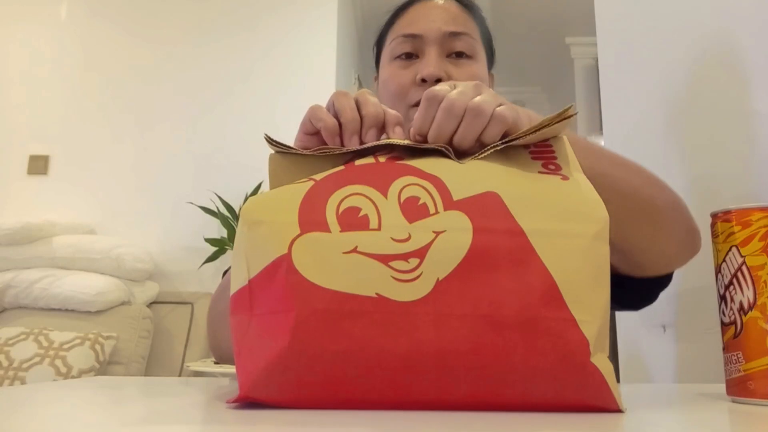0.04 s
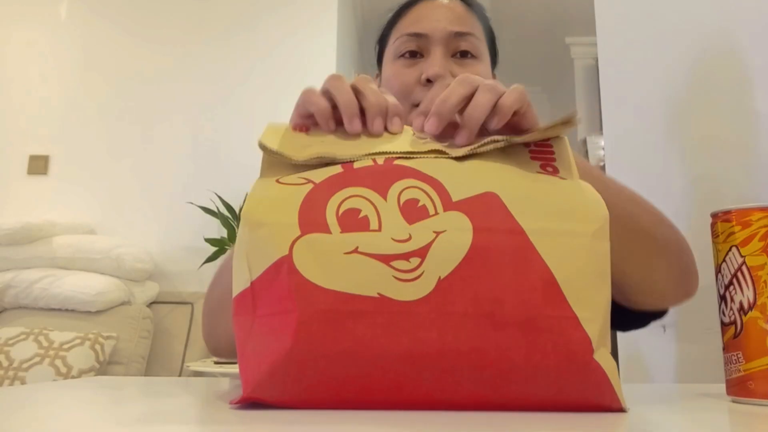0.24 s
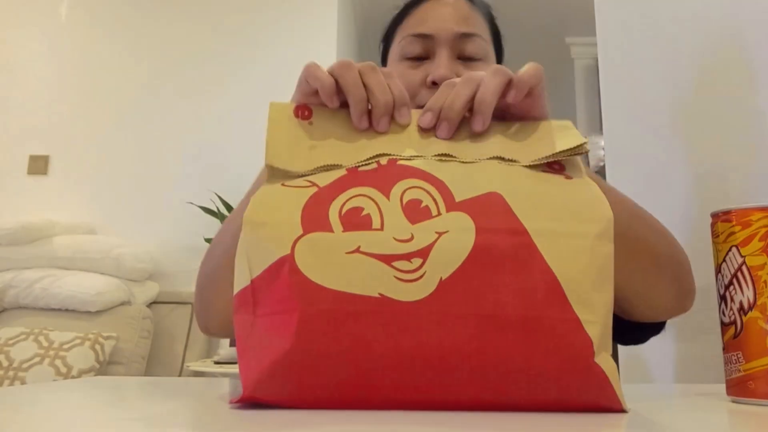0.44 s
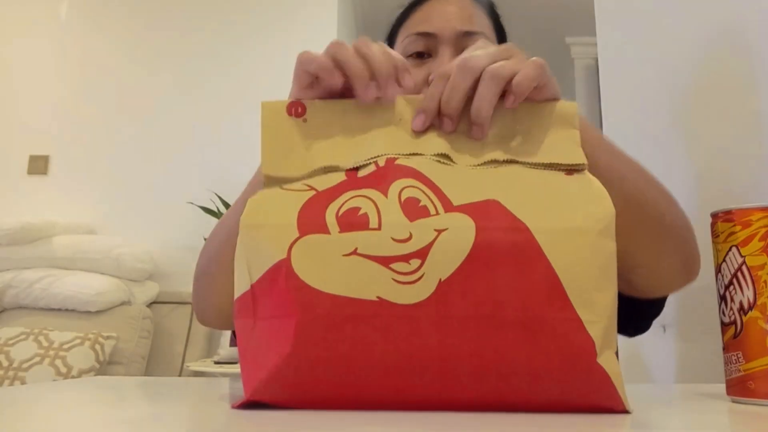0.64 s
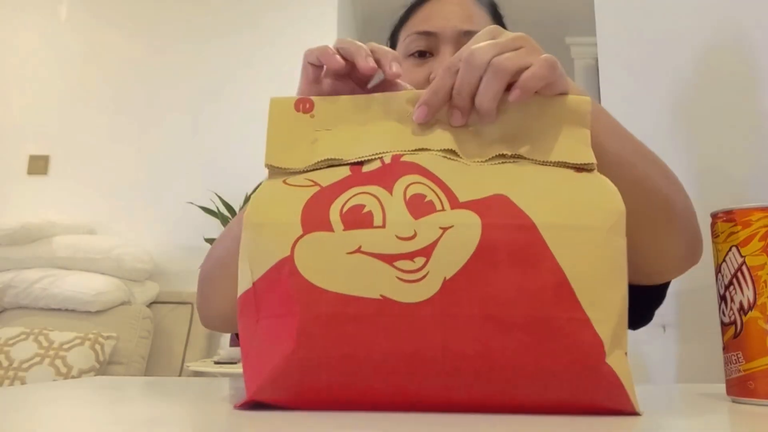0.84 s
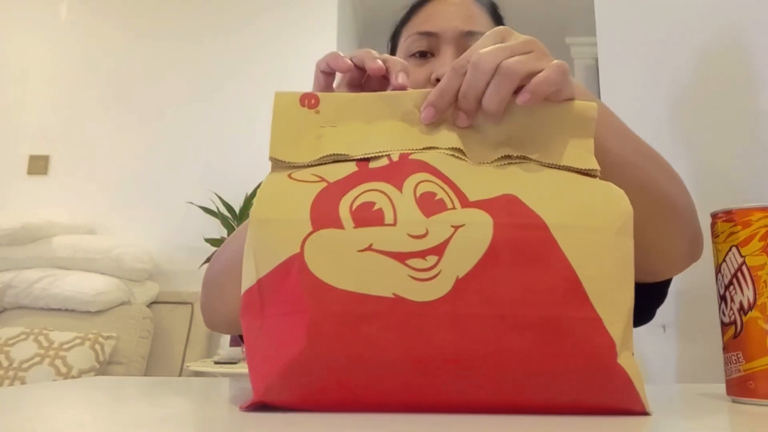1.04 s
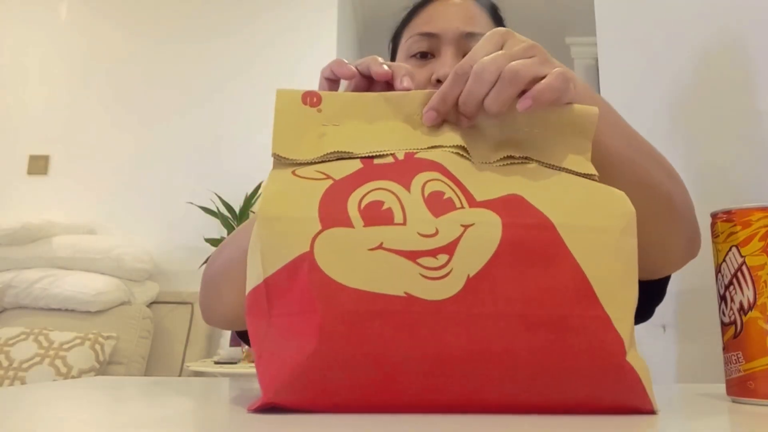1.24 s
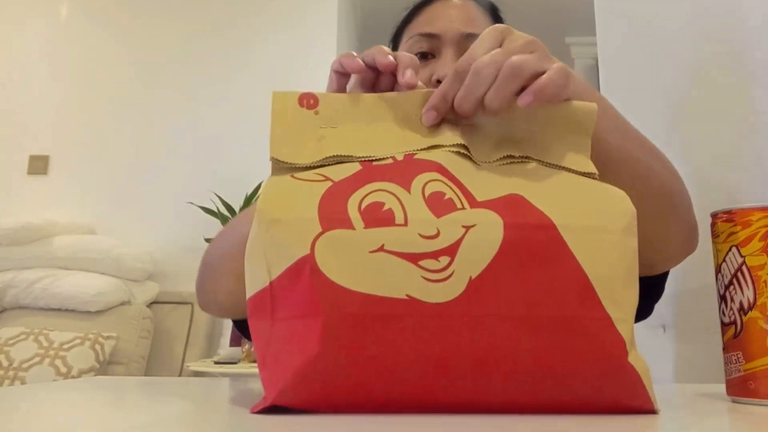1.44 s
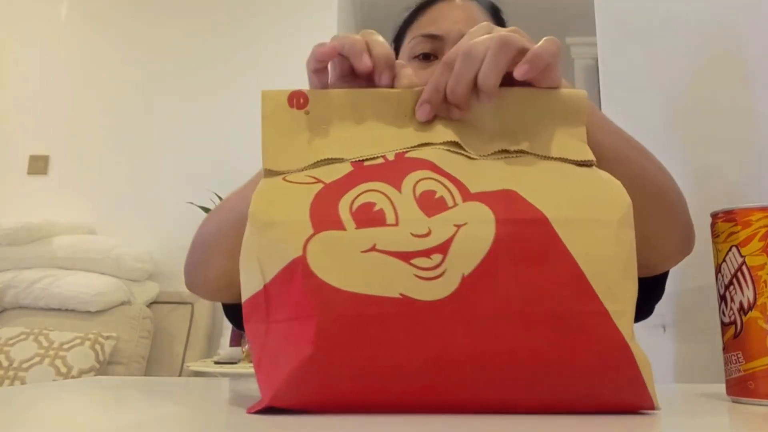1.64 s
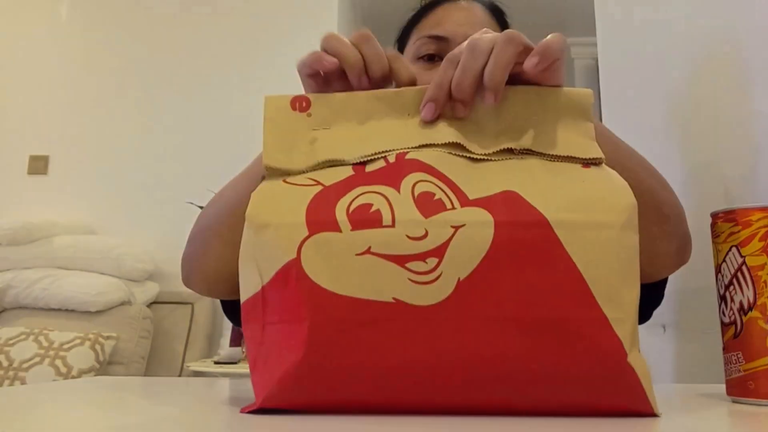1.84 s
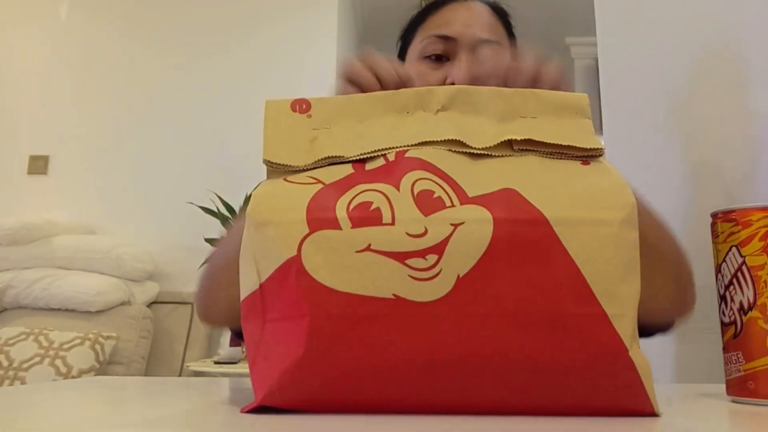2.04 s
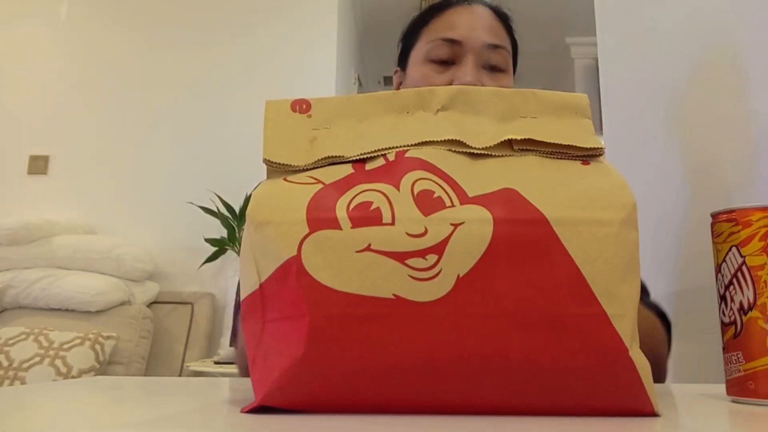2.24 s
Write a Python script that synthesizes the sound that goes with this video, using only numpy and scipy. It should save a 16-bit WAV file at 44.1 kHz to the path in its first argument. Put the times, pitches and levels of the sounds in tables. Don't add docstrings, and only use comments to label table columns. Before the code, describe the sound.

Hands work the folded top of a heavy paper bag on a table: quick bursts of sharp crackle, brittle snaps and dull base bumps, easing to a soft finger brush, with short room reverberation and faint air.

```python
import sys
import numpy as np
from scipy import signal
from scipy.fft import rfft, irfft, next_fast_len
from scipy.io import wavfile
from scipy.ndimage import uniform_filter1d, map_coordinates

SR = 44100
rng = np.random.default_rng(int(sys.argv[2]) if len(sys.argv) > 2 else 0)


def wrap_up_sound(samples):
    columns = np.atleast_2d(samples).T
    tamed = np.clip(columns, -1, 1)
    steps = np.round(tamed * 32767).astype(np.int16)
    wavfile.write(sys.argv[1], SR, steps)


def undo_db(level):
    steps = np.asarray(level, float) / 20
    return 10 ** steps


N = 101429


def unit(x):
    return x / np.sqrt(np.mean(x ** 2) + 1e-20)


def noise():
    return rng.standard_normal(N)


def along(points, hz):
    f, v = np.transpose(points)
    return np.interp(np.log(hz + 1), np.log(f + 1), v)


def wobble(knots_per_s):
    return map_coordinates(rng.standard_normal(300), [np.arange(N) * knots_per_s / SR])


def coloured(x, spectrum):
    m = 2 * next_fast_len(N // 2 + 4096)
    hz = np.fft.rfftfreq(m, 1 / SR)
    gain = undo_db(along(spectrum, hz)) * np.clip(hz / spectrum[0][0], 1e-3, 1) ** 2
    cepstrum = irfft(np.log(gain / np.sqrt(np.mean(gain ** 2))), m)
    cepstrum[1:m // 2] *= 2
    cepstrum[m // 2 + 1:] = 0
    return irfft(rfft(x, m) * np.exp(rfft(cepstrum)), m)[:N]


def ring(t, hz, t60_s, rise_s):
    return undo_db(-60 * t / t60_s) * (1 - np.exp(-t / rise_s)) * np.sin(2 * np.pi * hz * t)


def resonance(f, hz, q):
    return 1j * f * hz / q / (hz * hz - f * f + 1j * f * hz / q)


def patchy(x):
    patch_db = 3
    z = signal.stft(x, nperseg=256)[2]
    field = uniform_filter1d(rng.standard_normal(z.shape), size=9, axis=0)
    field = uniform_filter1d(field, size=4, axis=1)
    return signal.istft(z * undo_db(patch_db * unit(field)), nperseg=256)[1][:N]


# (frequency [Hz], density [dB per Hz])
AIR_SPECTRUM = [(25, -7), (90, -2.5), (200, -6), (450, -19), (1100, -20), (4000, -32.5), (16000, -33.5)]
AIR_DB, DUCK_DB, DUCK_S = -53.5, 9, 0.051


def floor(bag):
    hop = 64
    memory = np.exp(-np.arange(300) * hop / SR / DUCK_S)
    busy = np.convolve(np.abs(bag[::hop]) > .05, memory)
    depth = np.interp(np.arange(N), np.arange(len(busy)) * hop, np.tanh(busy))
    air = unit(coloured(noise(), AIR_SPECTRUM))
    return undo_db(AIR_DB + 1.1 * wobble(36)) * undo_db(-DUCK_DB * depth) * air


# (time [s], peak [dB], pitch [Hz])
BASE_BUMPS = [(0, -26, 637), (0.028, -36.5, 46.8), (.09, -36, 52.8), (.165, -32, 430), (0.239, -44, 72),
              (0.281, -22, 542), (0.331, -42, 218), (0.4, -25, 168), (1.1, -38, 56.3), (0.473, -28, 192),
              (0.599, -22, 250), (0.719, -26.5, 225), (1.044, -17, 217), (1.19, -27.5, 207),
              (1.23, -44, 49.3), (1.301, -31.5, 104.3), (1.431, -14.5, 456), (1.577, -24, 247),
              (1.637, -36.5, 122), (1.809, -21.5, 133), (1.819, -17.5, 218), (2.021, -24.5, 547),
              (2.054, -31, 558)]
BUMP_T60_S = 0.11
BUMP_RISE_CYCLES, BUMP_RING_CYCLES = 0.15, 8


def bumps():
    out, t = np.zeros(N + SR), np.arange(SR // 2) / SR
    for s, db, hz in BASE_BUMPS:
        t60_s = BUMP_T60_S * (200 / hz) ** .25
        rise = 1 - np.exp(-t * hz / BUMP_RISE_CYCLES)
        drive = undo_db(-60 * t / t60_s) * rise * rng.standard_normal(len(t))
        mode = ring(t, hz, BUMP_RING_CYCLES / hz, 1 / hz)
        thud = signal.fftconvolve(drive, mode)[:len(t)]
        out[round(s * SR):][:len(t)] += undo_db(db) * thud / np.abs(thud).max()
    return out[:N]


# (time [s], level [dB])
HAND_EFFORT = [(.02, -47.5), (.05, -57), (0.196, -45), (0.214, -30.5), (.81, -36), (.87, -52.5),
               (1.06, -34.5), (1.16, -47), (1.213, -28.5), (1.401, -39.5), (1.5, -64), (1.621, -26.5),
               (1.705, -38), (1.79, -58.5), (1.82, -22), (1.899, -35.5), (1.971, -44), (2.089, -63.5)]
# (frequency [Hz], density [dB per Hz])
RUSTLE_SPECTRUM = [(280, -4), (420, 2), (900, -3), (2500, -7), (5600, -17), (9000, -26), (16000, -23.5)]
CRACKLES_PER_S, CRACKLE_SPREAD_DB, CRACKLE_T60_S, SLIDE_DB = 1100, 4, .0025, -3


def crackle():
    s, db = np.transpose(HAND_EFFORT)
    effort = undo_db(np.interp(np.arange(N) / SR, s, db) + 2.2 * wobble(60))
    chance, size = rng.random((2, N))
    hits = chance < CRACKLES_PER_S / SR * undo_db(5 * wobble(70))
    clicks = hits * undo_db(-CRACKLE_SPREAD_DB * np.log(np.clip(size, .01, 1)))
    decay = undo_db(-60 * np.arange(400) / SR / CRACKLE_T60_S)
    grains = unit(np.convolve(clicks, decay)[:N] * noise())
    slide = undo_db(SLIDE_DB) * noise()
    return coloured(effort * (grains + slide), RUSTLE_SPECTRUM)


# (time [s], level [dB])
FINGER_PRESSURE = [(.18, -53.5), (.225, -23.5), (.33, -36), (.42, -27.5), (.65, -34), (.8, -33), (.86, -49),
                   (1.03, -46), (1.17, -48), (1.22, -49), (1.4, -55.5), (1.48, -67), (1.66, -33.5),
                   (1.76, -58), (1.86, -37), (2.06, -63)]
# (frequency [Hz], density [dB per Hz])
SKIN_SPECTRUM = [(3000, -17.5), (6000, 5.5), (10000, 0.5), (15500, 0.5)]
RUB_DB = -7


def rub():
    s, db = np.transpose(FINGER_PRESSURE)
    pressure_db = np.interp(np.arange(N) / SR, s, db)
    level_db = pressure_db + RUB_DB + 2.5 * wobble(67) + 2.0 * wobble(25)
    return undo_db(level_db) * patchy(coloured(noise(), SKIN_SPECTRUM))


def small_breaks(events, trim_db):
    t60_s, q = .011, 1.05
    out, t = np.zeros(N + SR), np.arange(1024) / SR
    f = np.fft.rfftfreq(len(t), 1 / SR)
    for s, db, hz in events:
        burst = undo_db(-60 * t / t60_s) * rng.standard_normal(len(t))
        band = 1j * f * hz / (hz * hz - f * f + 1j * f * hz / q)
        click = irfft(rfft(burst) * band ** 2)
        out[round(s * SR):][:len(t)] += undo_db(db + trim_db) * click / np.abs(click).max()
    return out[:N]


# (time [s], peak [dB], pitch [Hz])
FIBRE_TEARS = [(.1515, -31, 10500), (.307, -20, 9010), (.4043, -4, 9800), (.4397, -15, 9870),
               (.5294, -16.5, 10360), (.5988, -18, 9300), (.6535, -12, 9870), (.6965, -18, 9800),
               (.807, -22, 8900), (1.2088, -26, 9970), (1.3115, -22, 9460), (1.3628, -29, 9000),
               (1.868, -15, 10500), (1.9985, -24, 9950), (1.5405, -26, 2500), (1.574, -12.5, 3980),
               (1.64, -17, 9500), (.6705, -6, 10200), (1.397, -13, 3900)]


def fibres():
    return small_breaks(FIBRE_TEARS, trim_db=2)


# (time [s], peak [dB], crack pitch
# [Hz], panel ring over crack [dB], crisp edge over crack [dB])
BUCKLES = [(0.2089, -18, 1696, -20, -19), (0.2578, -18, 2090, -4.5, -21.5),
           (0.301, -16, 2140, -9, -15), (0.3191, -12.5, 2600, -9, -13.5),
           (0.328, -9, 1340, -18.5, -12.5), (0.3649, -8, 1760, -3.5, -36.5),
           (0.3778, -17.5, 2880, 0, -10), (0.3918, -9, 2100, -20.5, -15.5),
           (0.4728, -8, 1510, -10, -12.5), (0.491, -16.5, 1380, 2, -12.5),
           (0.5203, -9, 1380, -6, -27.5), (0.5474, -19, 2760, -28, 1.5),
           (0.5824, -4.5, 1470, -14.5, -16.5), (0.6094, -4, 2240, -6, -19),
           (0.631, -7, 2110, -12, -13.5), (0.6716, -12.5, 1900, -6, -6.5),
           (0.7173, -9.5, 1570, -26, -12.5), (0.7379, -13.5, 1960, -1, -10.5),
           (0.7599, -9, 1960, -10.5, -19.5), (0.7945, -13, 1310, -28, -17.5),
           (0.82, -3, 1980, -21.5, -26), (0.952, -6.5, 6400, -13.5, -15),
                 (0.9643, -13, 1360, -5, -15), (0.9962, -25, 2160, 1.5, 0), (1.0411, -10, 3040, 0, -14),
                 (1.047, -10, 1620, -4, -32), (1.1851, -4.5, 3020, -32.5, -7.5),
                 (1.2088, -15.5, 1750, -5.5, -1), (1.2415, -11.5, 1760, -14.5, -10.5),
                 (1.2858, -11, 2010, -7.5, -21.5), (1.3011, -8, 1440, -5.5, -31),
                 (1.3512, -14.5, 1290, 1.5, -14), (1.3974, -10, 3860, -9.5, -27),
                 (1.4294, -7, 1940, -11.5, -40),
           (1.5448, -9.5, 3560, -7, -24), (1.5578, -13, 1460, 0, -23), (1.5743, -13, 1440, -3, -35),
                  (1.5939, -8.5, 1930, -9, -18.5), (1.63, -8.5, 1560, -9, -11),
                  (1.6399, -16.5, 1720, -8.5, -3.5), (1.7386, -9.5, 1830, -13.5, -59),
                  (1.7751, -7.5, 1356, -9.5, -31), (1.8052, -10.5, 2110, -7, -15),
                  (1.8198, -9, 3110, -7, -8), (1.8271, -9, 1385, 2.5, -13.5),
                  (1.8363, -4, 1470, -14.5, -24), (1.8624, -10, 1340, -26, -15.5),
                  (1.8815, -11.5, 1354, -18, -27), (2.0042, -12.5, 2560, -31.5, -26),
                  (2.0125, -14.5, 1450, -10, -28)]
# (frequency [Hz], level [dB])
CRACK_SPECTRUM = [(500, -4.5), (1200, -2.5), (2500, -1), (6000, -6.5), (8000, -26)]
EDGE_SPECTRUM = [(5500, -3.5), (7000, -0.5), (10000, 0), (15500, -3.5), (16500, -25.5)]
PANEL_HZ = [450, 598, 685.6, 971, 1179]
VOLLEY_S, FADE_S, RISE_S, CLICK_SPREAD_DB = 0.0056, 0.005, 0.0006, 3.5
LEAD_S, LEAD_DB = .006, -29
CRACK_DB, RING_DB, EDGE_DB = -10.5, -0.5, 2
PEAK_DB, PEAK_Q = 4, 3
PANEL_T60_S, PANEL_RISE_S, PANEL_SPREAD_DB = 0.031, 0.0019, 2.5


def volley_shape(t):
    rise = 1 - np.exp(-(t / RISE_S) ** 2)
    fade_db = -60 * np.clip(t - VOLLEY_S, 0, 1) / (3 * FADE_S)
    sag_db = -9.4 * np.clip(t / VOLLEY_S, 0, 1)
    main = np.roll(rise * undo_db(fade_db + sag_db), round(LEAD_S * SR))
    return main + undo_db(LEAD_DB) * (t / LEAD_S) ** 2 * (t < LEAD_S + RISE_S)


def panel_modes(t):
    out = np.zeros(len(t))
    for hz in PANEL_HZ:
        detune, gain = rng.standard_normal(2)
        mode = ring(t, hz * (1 + 0.041 * detune), PANEL_T60_S, PANEL_RISE_S)
        out += undo_db(PANEL_SPREAD_DB * gain) * mode
    return out


def creases():
    crack, edge, tones = np.zeros((3, N + SR))
    t = np.arange(4096) / SR
    f = np.fft.rfftfreq(len(t), 1 / SR)
    shape = volley_shape(t)
    for s, db, hz, ring_db, edge_db in BUCKLES:
        lumps = undo_db(CLICK_SPREAD_DB * np.repeat(rng.standard_normal(len(t) // 16), 16))
        volley = shape * lumps * rng.standard_normal((3, len(t)))
        volley = 12 * volley / np.linalg.norm(volley, axis=1)[:, None]
        peak = 1 + undo_db(PEAK_DB) * resonance(f, hz, PEAK_Q)
        panel = signal.fftconvolve(volley[2], panel_modes(t))[:len(t)]
        crisp = volley[1] * undo_db(-300 * np.abs(t - LEAD_S))
        i = round((s - RISE_S - LEAD_S) * SR)
        crack[i:i + len(t)] += undo_db(db + CRACK_DB) * irfft(rfft(volley[0]) * peak)
        edge[i:i + len(t)] += undo_db(db + edge_db + EDGE_DB) * crisp
        tones[i:i + len(t)] += undo_db(db + ring_db + RING_DB) * panel / np.abs(panel).max()
    return coloured(crack[:N], CRACK_SPECTRUM) + coloured(edge[:N], EDGE_SPECTRUM) + tones[:N]


# (time [s], peak [dB], pitch [Hz])
CREASE_TICKS = [(.2262, -12.5, 1760), (.2605, -11, 2180), (.2795, -12, 1320), (.307, -11.5, 2800),
                (.3143, -12, 3000), (.3704, -11.5, 1230), (.4073, -6, 2520), (.4397, -12, 2000),
                (.5534, -9, 2700), (.619, -9, 1510), (.6546, -13, 2400), (.807, -11.5, 2100),
                (.931, -25.5, 1100), (1.0335, -18, 4500), (1.095, -18, 2500), (1.254, -10, 3020),
                (1.2697, -17, 2600), (1.2852, -6.5, 3000), (1.3115, -13, 2000), (1.3316, -13, 1260),
                (1.3372, -10, 1130), (1.3508, -19, 1960), (1.4334, -10, 2430), (1.5578, -2, 5140),
                (1.5785, -8.5, 1980), (1.6107, -35, 3030), (1.6203, -6, 840), (1.6232, -17, 2000),
                (1.6355, -10, 2170), (1.6497, -37, 2500), (1.6562, -24, 1490), (1.6716, -19, 1790),
                (1.6885, -18, 2000), (1.8117, -6, 1330), (1.8434, -5, 1200), (1.932, -20, 1360),
                (2.025, -26, 1500), (2.0525, -23, 1750)]


def ticks():
    return small_breaks(CREASE_TICKS, trim_db=-3)


# (time [s], peak [dB])
BRITTLE_SNAPS = [
    (0.5183, -6.5),
    (0.5869, -3.5),
    (0.6706, -14),
    (1.1872, -13.5),
    (1.2865, -25),
    (1.351, -11.5),
    (1.5575, -30),
    (1.776, -13.5),
]
SNAP_T60_S, SNAP_DB = 0.008, 8.5


def snaps():
    out, t = np.zeros(N + SR), np.arange(1024) / SR
    for s, db in BRITTLE_SNAPS:
        burst = undo_db(-60 * t / SNAP_T60_S) * rng.standard_normal(len(t))
        out[round(s * SR):][:len(t)] += undo_db(db + SNAP_DB) * burst / np.abs(burst).max()
    return coloured(out[:N], [(1500, -10), (5000, 0.5), (16900, -0.5)])


def brush():
    at_s, length_s, level_db = 1.958, .02, -41
    swell = np.exp(-((np.arange(N) / SR - at_s) / length_s) ** 2)
    spectrum = [(4800, -14), (5600, 0), (6400, 0), (7000, -14), (10000, -8), (15500, -12)]
    return undo_db(level_db) * swell * coloured(noise(), spectrum)


# (frequency [Hz], T60 [s])
ROOM_T60 = [(200, 0.42), (1000, 0.25), (5000, 0.25), (9000, 0.22), (15000, 0.17)]
ROOM_DB = -8.5


def room(x):
    out, size, delay = np.zeros(N + SR), SR // 8, 150
    for i in range(0, N, size):
        hz, t, z = signal.stft(rng.standard_normal(SR // 3), SR, nperseg=128)
        decay = undo_db(-60 * t / along(ROOM_T60, hz)[:, None])
        tail = signal.istft(z * decay, SR, nperseg=128)[1]
        wet = signal.fftconvolve(x[i:i + size], tail / np.linalg.norm(tail))
        out[i + delay:i + delay + len(wet)] += wet
    return out[:N]


def gated(x):
    gate_db, depth_db, window_s = -31.5, 11, 0.01
    power = np.abs(uniform_filter1d(x ** 2, round(window_s * SR)))
    level_db = 10 * np.log10(power + 1e-12)
    return x * undo_db(-depth_db * np.clip((gate_db - level_db) / 10, 0, 1))


def scene():
    bag = bumps() + patchy(crackle()) + creases() + snaps()
    wet = undo_db(ROOM_DB) * room(bag)
    paper = gated(bag + wet + fibres() + ticks())
    return (floor(bag) + paper + rub() + brush())[None]


def roll_off(x):
    return signal.sosfilt(signal.butter(12, 17150, fs=SR, output="sos"), x)


# (frequency [Hz], gain [dB])
MIC_RESPONSE = [(30, -1), (50, 3), (6500, -1), (8000, -8), (10300, 1.5), (12800, -17.5), (14000, -12),
                (15300, -3)]
LIMIT = .7
TOP_HZ, STEADY_TOP_HZ, PASS_DB = 17100, 15950, -31


def record(dry):
    hz = np.fft.rfftfreq(N, 1 / SR)
    x = irfft(rfft(dry) * undo_db(along(MIC_RESPONSE, hz)), N)
    z = rfft(x / (1 + np.abs(x / LIMIT) ** 4) ** .25)
    body = np.clip((STEADY_TOP_HZ - hz) / 250, 0, 1)
    top = irfft(z * (1 - body) * np.clip((TOP_HZ - hz) / 300, 0, 1), N)
    loud = uniform_filter1d(top ** 2, size=256) > undo_db(2 * PASS_DB)
    passed = uniform_filter1d(1. * loud, size=300)
    return roll_off(irfft(z * body, N) + passed * top)


dry = scene()
out = record(dry)
wrap_up_sound(out)
```